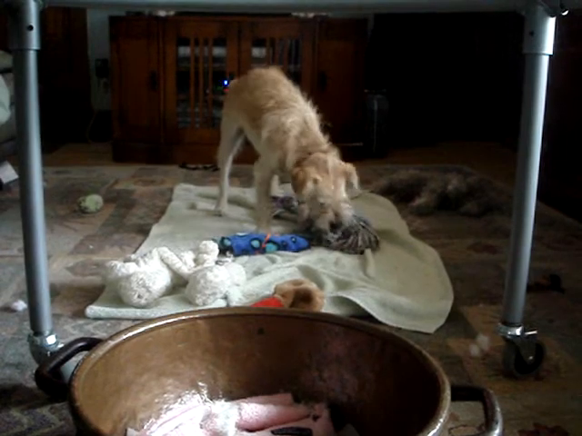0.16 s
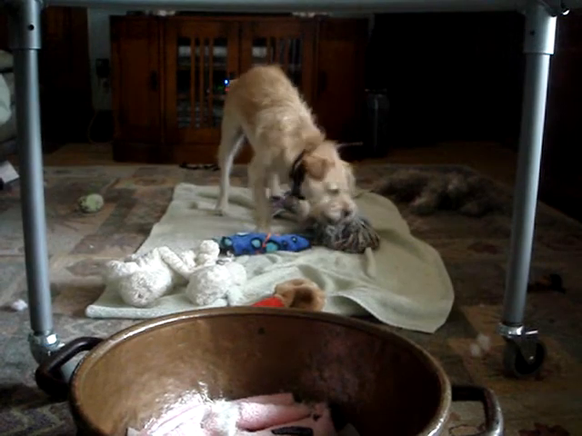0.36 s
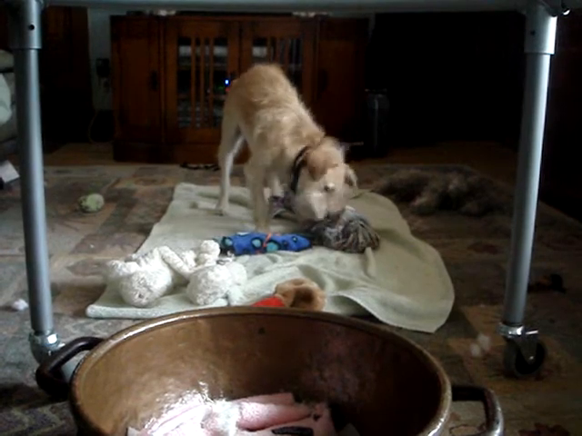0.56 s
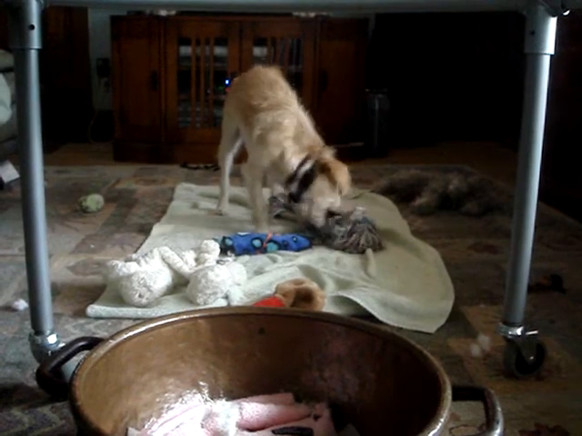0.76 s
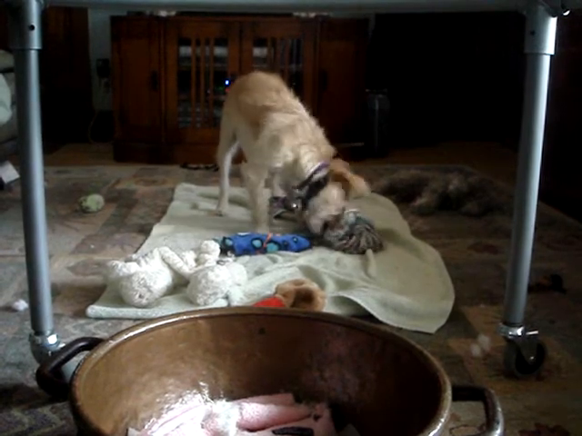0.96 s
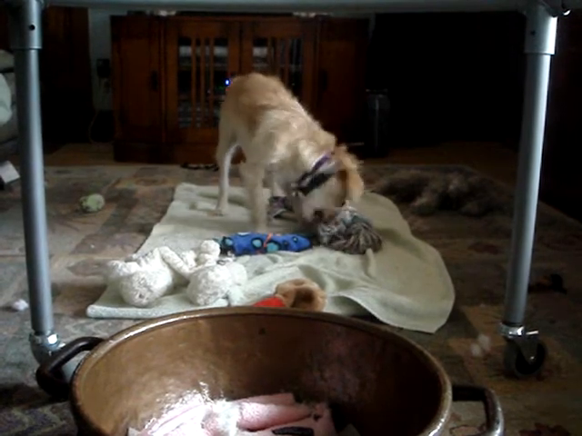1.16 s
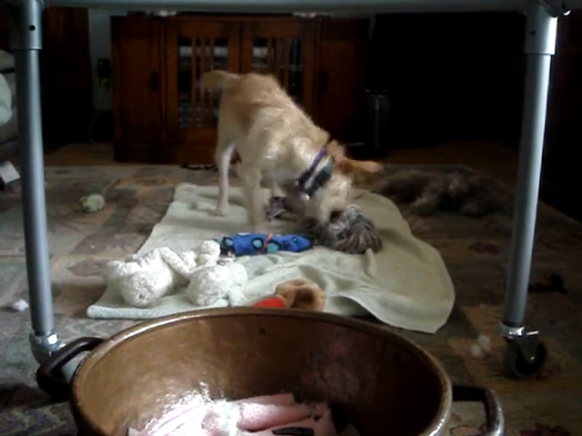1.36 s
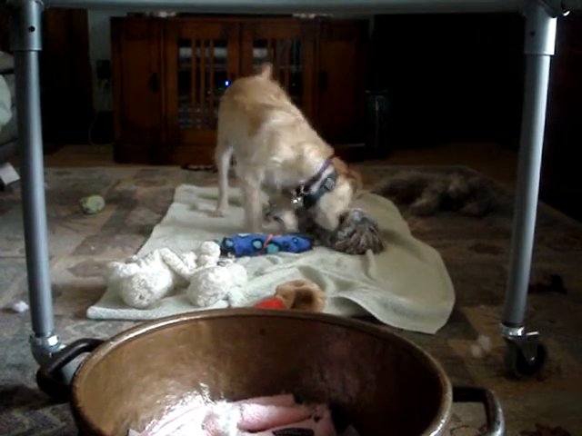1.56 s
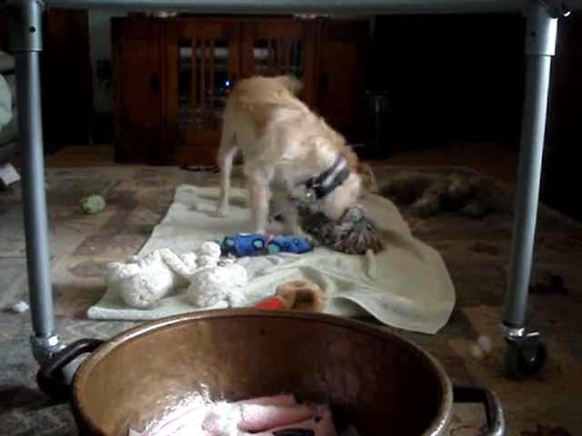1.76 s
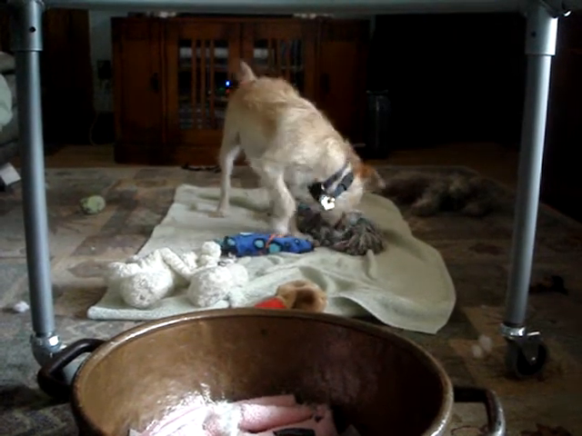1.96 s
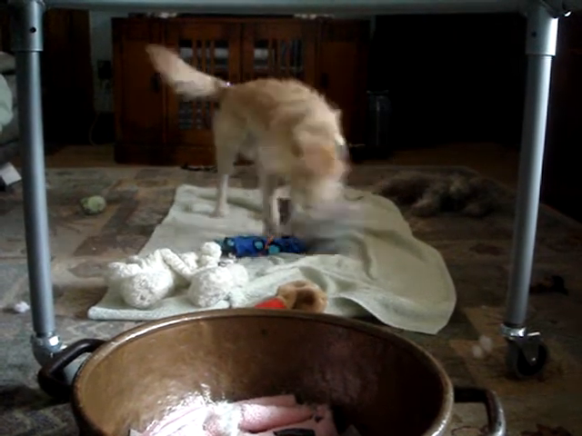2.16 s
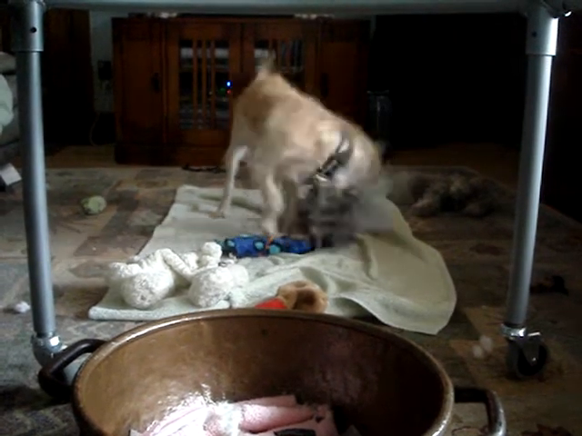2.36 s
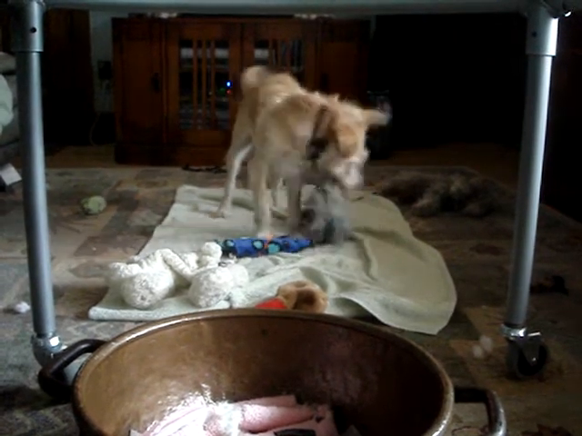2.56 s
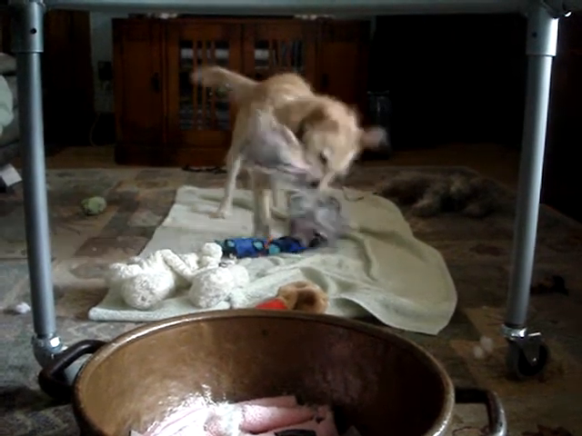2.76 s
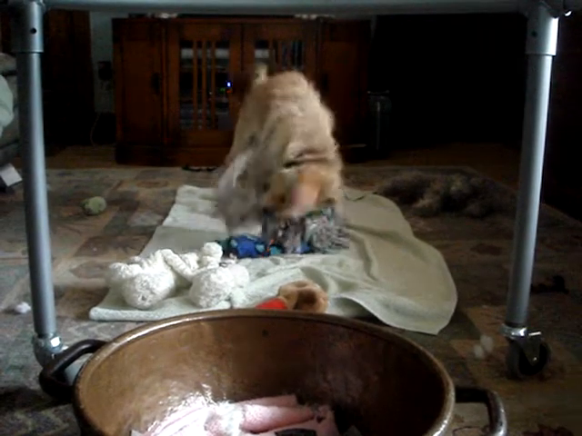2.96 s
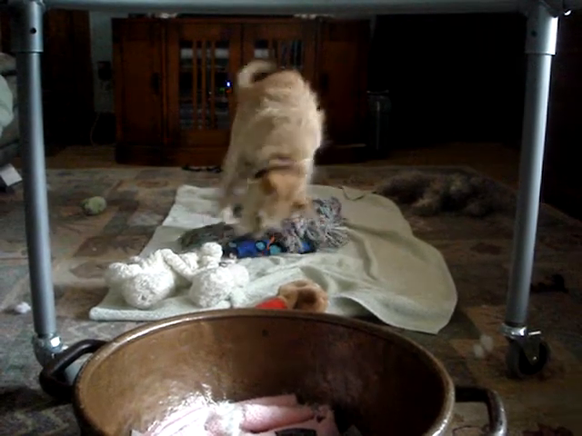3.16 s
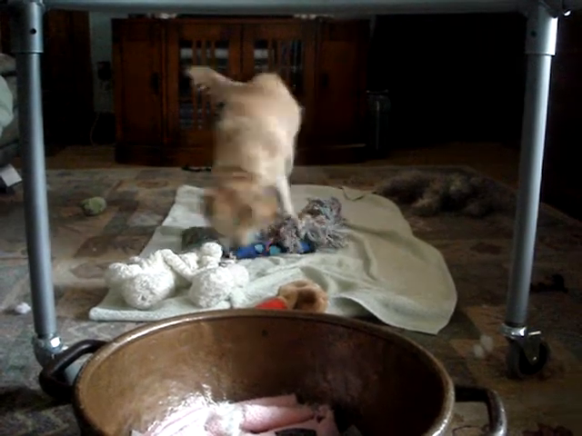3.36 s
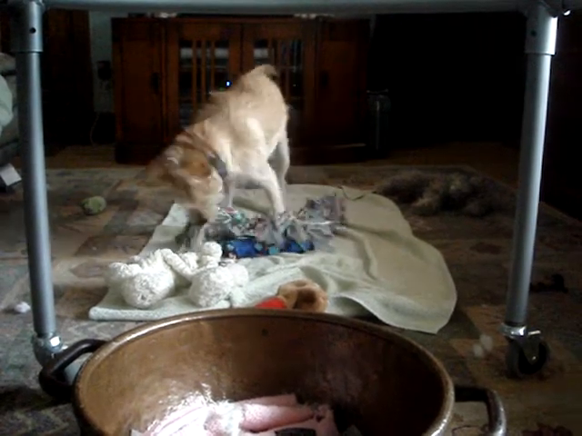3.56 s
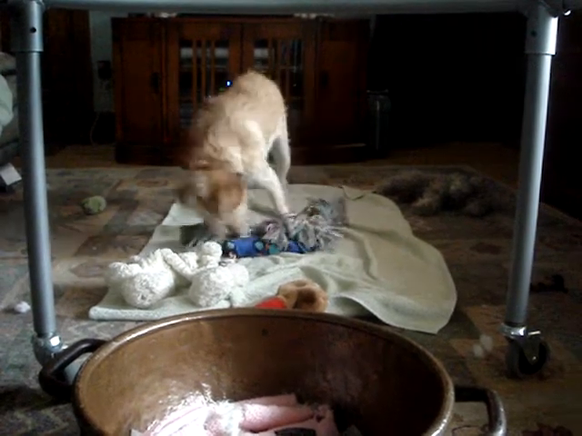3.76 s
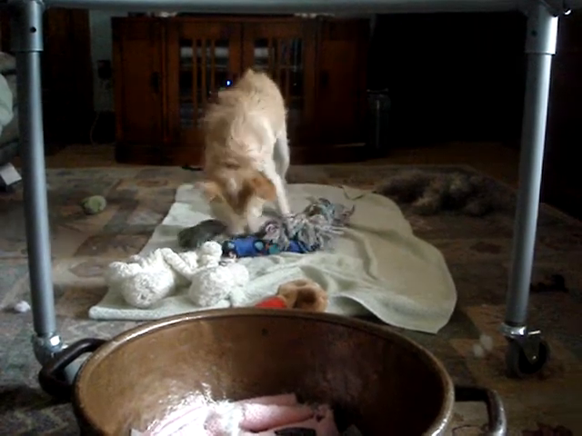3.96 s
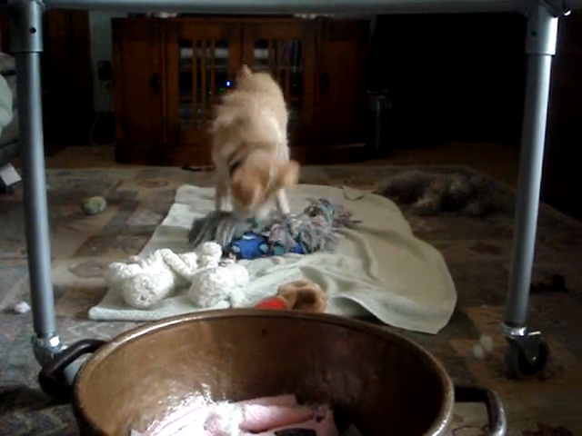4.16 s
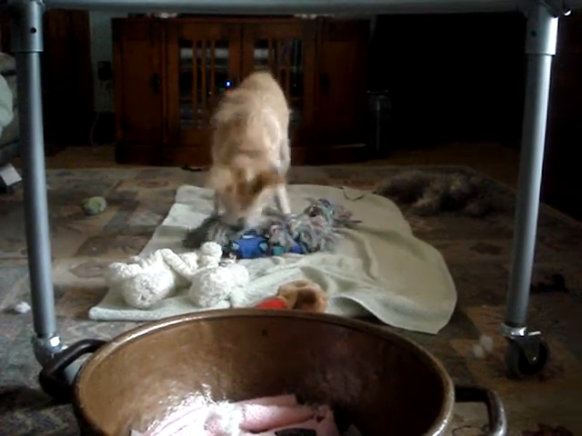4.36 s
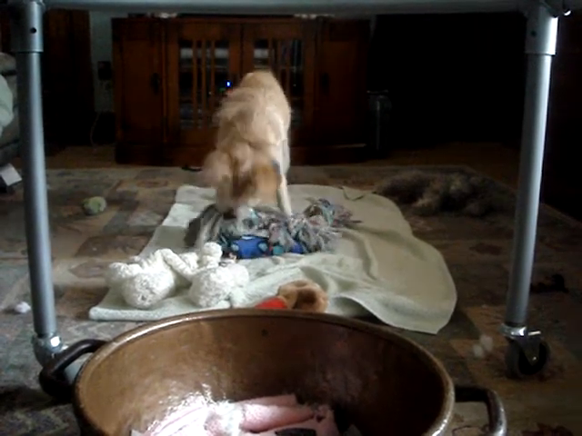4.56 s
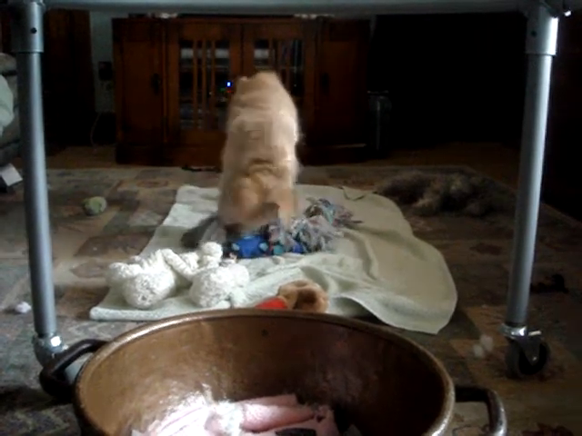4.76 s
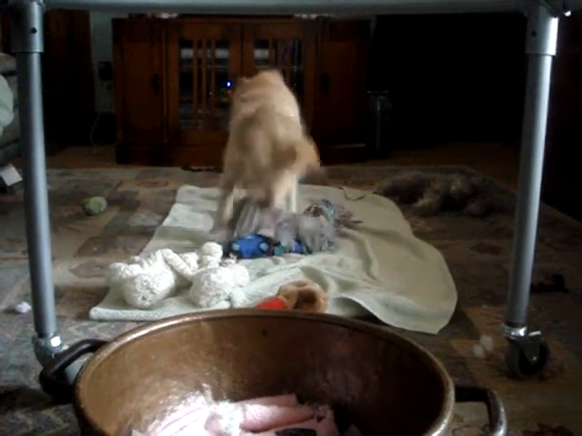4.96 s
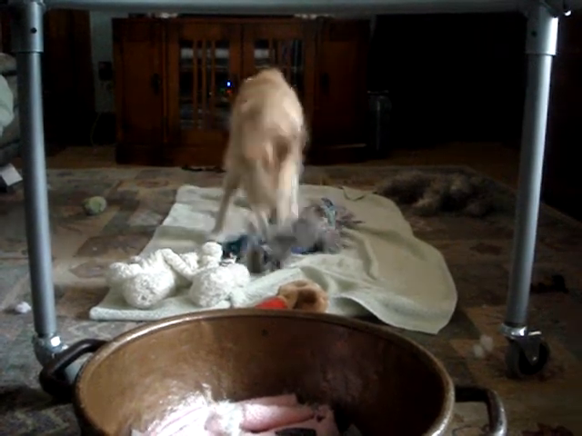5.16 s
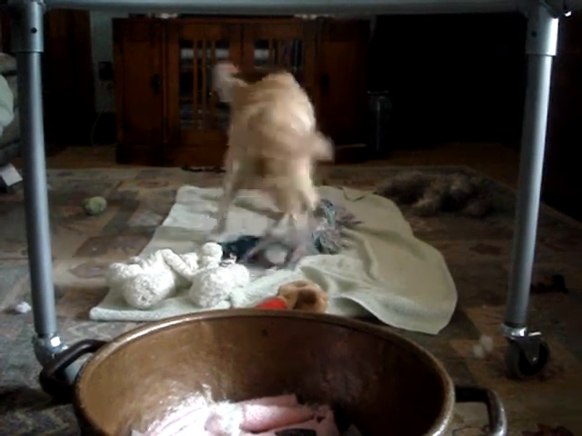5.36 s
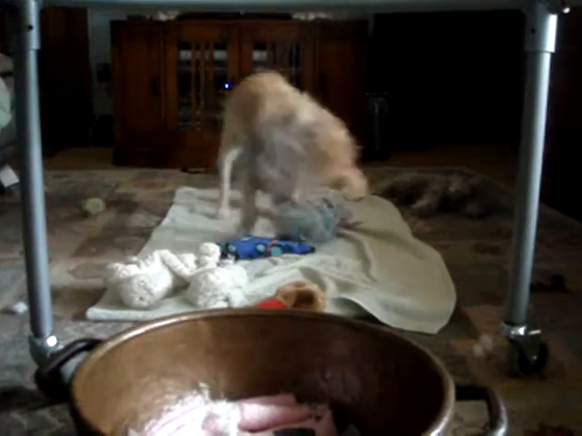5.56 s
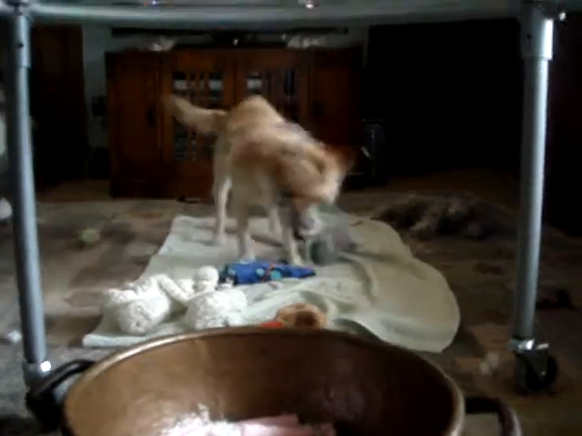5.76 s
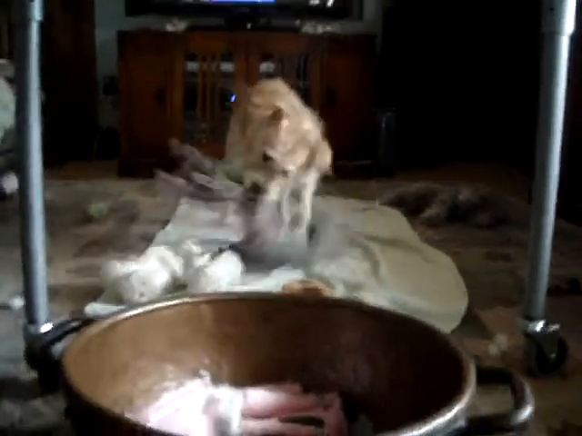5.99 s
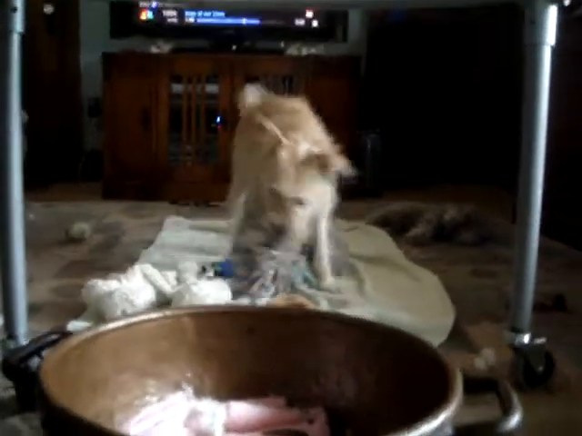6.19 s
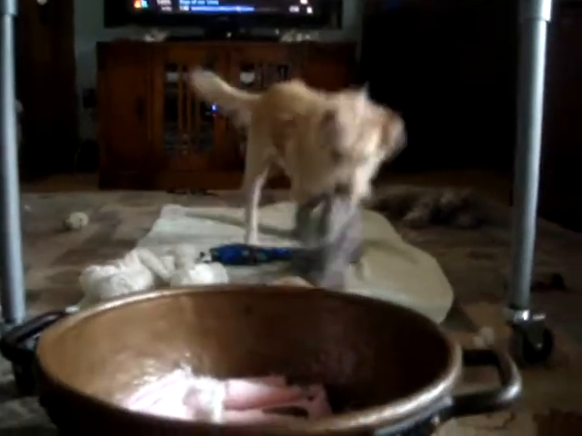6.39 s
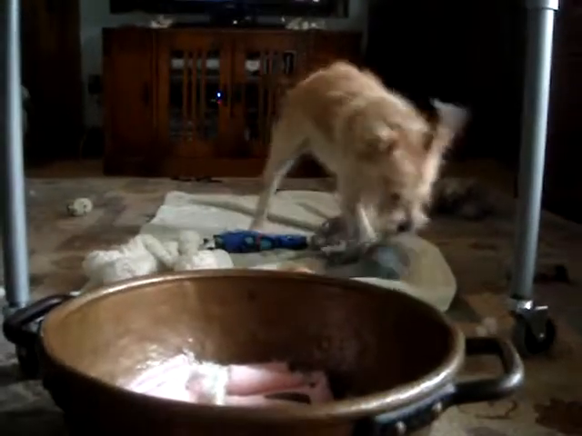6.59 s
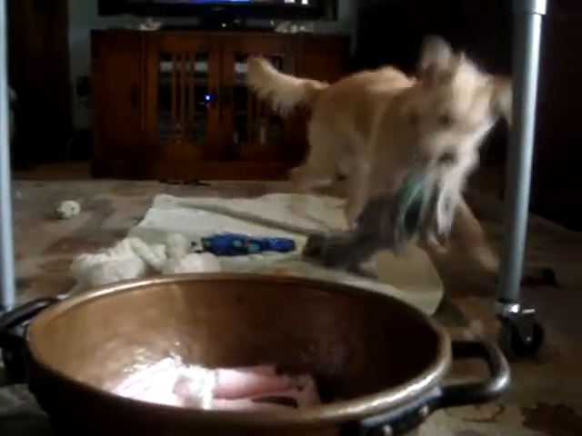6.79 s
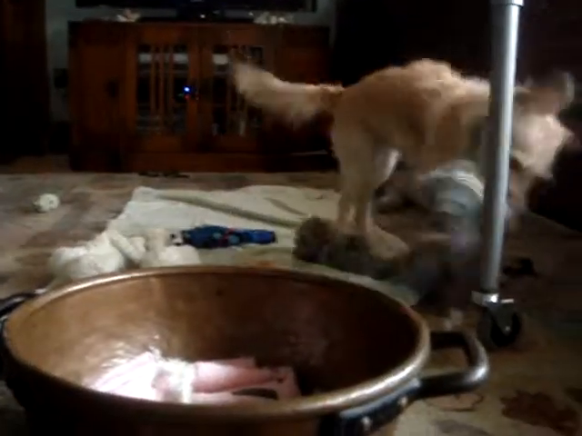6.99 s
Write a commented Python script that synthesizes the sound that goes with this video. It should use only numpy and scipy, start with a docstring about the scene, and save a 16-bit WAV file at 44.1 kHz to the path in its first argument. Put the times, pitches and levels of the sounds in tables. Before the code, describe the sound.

Steady small-microphone hiss and a barely audible high whistle fill a dry, furnished room. From 0 to 2 seconds, a dog's collar tags give light, irregular clinks, with a bright cluster around 0.55 to 0.8 and sharper ticks near 1.8, over faint cloth stirring. At about 2.3 to 2.65 the dog shakes a soft toy: dense jingling, a rustle, soft flaps and a puff of pressure. A dull floor thud with a quick bounce lands near 3.1, a fainter one at 3.2. Sparse clinks follow, then a short rattle around 4.0 to 4.15 and small scuffs until 4.7. After a few ticks near 5.1, the strongest shaking runs from 5.4 to 6.0, with loud bright jangling, swishing fabric, slaps and low rumble. Another rustle and flap come at 6.25, a jingling shake with a soft thump at 6.6, then a faint thud and last clink near 7.0.

```python
"""Bright metal clinks come in bursts, over cloth rustle, soft flaps and a few thuds on the floor:
a dog worries and shakes a soft toy on a blanket in a furnished room.
Touches of the collar tags ring damped metal modes; cloth is clumpy noise; thuds ring floor boards.
A small microphone adds hiss and feels the shakes as puffs of pressure; a thin whistle hangs in the room."""
import sys
import numpy as np
from scipy import signal
from scipy.fft import rfft, irfft
from scipy.io import wavfile

SR = 44100
rng = np.random.default_rng(int(sys.argv[2]) if len(sys.argv) > 2 else 0)


def wav_out(sig):
    """Save sig, one row per channel (or a flat mono array), as 16-bit PCM at SR to the path in sys.argv[1]."""
    wavfile.write(sys.argv[1], SR, np.round(np.clip(np.atleast_2d(sig).T, -1, 1) * 32767).astype(np.int16))


def level_to_linear(level):
    """Convert decibel levels to linear amplitude factors, elementwise."""
    exponent = np.asarray(level, float) / 20
    return 10 ** exponent


N = 310023   # length in samples

# Tags touching. Each row: time in seconds, peak of the dull clack in dB and of the bright ring in dB
# (both before their high-pass), chatter scale in ms.
CLINKS = [(0.0199, -39, -30, 6.1), (0.204, -50, -33.5, 7.5), (0.5515, -32.5, -29, 1.85),
          (0.5582, -30, -32, 3.2), (0.5793, -28.5, -37, 2.3), (0.7255, -37.5, -41, 4.7),
          (0.7588, -33, -34.5, 0.69), (0.8115, -26.5, -17.5, 1.63), (0.819, -33, -36, 3.3),
          (0.9221, -38, -26, 4.4), (1.027, -39, -36, 2.7), (1.118, -42.5, -37.5, 2.6),
          (1.3185, -33.5, -59, 0.66), (1.394, -40, -36.5, 6), (1.429, -33.5, -48, 2.5),
          (1.4423, -30.5, -29, 1.62), (1.457, -32, -34, 1.96), (1.484, -40, -36, 3.2),
          (1.501, -38, -33, 1.85), (1.6217, -34, -28, 1.6), (1.6324, -31, -21.5, 2.24),
          (1.786, -21, -42, 0.46), (1.8037, -28, -31.5, 0.43), (1.935, -32.5, -26.5, 1.33),
          (1.976, -33.5, -29.5, 2.3), (2.0013, -38, -30.5, 1.84), (2.0442, -35.5, -28.5, 3.65),
          (2.251, -32, -30, 11), (2.2677, -26.5, -37, 0.85), (2.357, -35, -23.5, 8),
          (2.372, -38, -31.5, 2.7), (2.397, -35.5, -20.5, 6), (2.4125, -28.5, -24, 2.6),
          (2.42, -50, -34, 4.3), (2.443, -19.5, -18.5, 0.78), (2.4488, -27.5, -22.5, 8.8),
          (2.459, -29, -24, 4.6), (2.536, -22.5, -24, 0.98), (2.554, -38, -33, 1.3), (2.559, -40, -27, 4),
          (2.6496, -29, -23.5, 1.14), (2.875, -34, -32, 3.5), (3.1038, -34, -55, 0.4),
          (3.4402, -34.5, -47, 4.1), (3.784, -34.5, -27.5, 6.1), (3.8128, -34, -30, 10),
          (3.999, -37.5, -32, 17), (4.0346, -32, -23.5, 4.5), (4.058, -30, -28, 4.9),
          (4.064, -31.5, -33, 4.1), (4.141, -28.5, -23.5, 10), (4.924, -32.5, -52, 2.6),
          (5.068, -26, -31, 2.26), (5.0787, -32, -37, 2.1), (5.148, -36.5, -57, 1.6),
          (5.4275, -25, -42, 1.7), (5.434, -27, -29.5, 1.8), (5.4381, -30, -29, 10.4),
          (5.522, -40, -23.5, 11.3), (5.539, -29, -29, 6.3), (5.548, -18, -17.5, 7.3),
          (5.579, -24.5, -25, 6), (5.6094, -19.5, -27, 1.53), (5.6744, -25, -50, 3.7),
          (5.692, -39, -24, 3.8), (5.715, -35, -29, 6.6), (5.732, -35, -18, 3.7), (5.737, -36, -22, 4.6),
          (5.761, -32, -24.5, 5.6), (5.818, -43, -23, 8.2), (5.826, -29.5, -16.5, 8),
          (5.913, -39, -29, 3.1), (5.9201, -32, -21.5, 8.2), (5.957, -33, -27, 6.2),
          (6.109, -31.5, -34.5, 11), (6.183, -28.5, -20.5, 2.5), (6.24, -33, -29.5, 3),
          (6.431, -30.5, -56, 2.5), (6.498, -46, -34, 9.3), (6.61, -31.5, -60, 10),
          (6.6272, -26, -19.5, 5.5), (6.683, -33.5, -29, 4.3), (7.019, -31, -32, 1.9)]
# Flat tag faces and collar hardware, heavily damped.
# Each row: nominal pitch in Hz, relative level in dB, time to fall 60 dB in seconds.
CLACK_MODES = [(1140, -16.5, 0.017), (1884, -13, 0.02), (2095, 1, 0.0061), (2850, 0, 0.0046),
               (3425, -11, 0.014), (3670, 0, 0.0026), (4820, -1, 0.0026)]
# Bending modes of the thin tags.
# Each row: nominal pitch in Hz, relative level in dB, time to fall 60 dB in seconds.
TAG_MODES = [(5200, -8.5, .004), (5630, 1, 0.041), (5950, 5.5, 0.029), (6500, -4, 0.075),
             (6970, 6.5, 0.024), (7885, 15.5, 0.01), (8495, 15.5, 0.011), (8860, 7, 0.01),
             (9570, 11, 0.015)]
# Single hard knocks of a tag edge. Each row: time in seconds, strike level in dB, pitch in Hz.
KNOCKS = [(0.5426, -39, 4300), (.5875, -34, 3350), (.978, -31, 7700), (1.304, -38.5, 3500),
          (1.7866, -18.5, 4950), (1.8042, -18.5, 5340), (2.124, -38, 2000), (5.0679, -28, 3370),
          (5.382, -37, 4500), (5.404, -37, 2000), (5.5533, -15, 6900), (5.886, -29.5, 2150),
          (5.958, -38, 3520), (6.466, -32.5, 6200), (6.5423, -28, 3300)]
KNOCK_CYCLES = 19.7   # cycles to fall 60 dB
# A tag swings free and one mode sings on. Each row: time in seconds, peak in dB, pitch in Hz.
CHIMES = [(2.361, -43, 6600), (5.914, -38.5, 5730)]
CHIME_T60_S = 0.21
# The tags tremble on after a touch: power against the touch peak, per ms of chatter scale.
SETTLE_DB, SETTLE_T60_S = -24.5, 0.27
RING_SETTLE_DB = -6.5   # further drop for the bright trembling
# Jerks of the collar that set the tags rattling. Each row: time in seconds, rms level in dB.
JERKS = [(.23, -54.5), (.84, -71), (1.535, -57), (1.655, -53.5), (2.49, -50), (5.88, -58.5), (6.665, -52),
         (4.04, -46), (5.96, -51)]
JERK_RISE_DB_PER_S, JERK_FALL_DB_PER_S = 252, 154
# Collar hardware brushing through the fur. Each row: start in seconds, rms level in dB.
SCUFFS = [(4.41, -54.5), (4.662, -52.5), (4.1, -57), (6.23, -59), (0.61, -56)]
SCUFF_HOLD_S, SCUFF_RISE_DB_PER_S, SCUFF_FALL_DB_PER_S = 0.029, 799, 301
# Collar ring dragging under the swinging toy.
# Each row: start of the hold in seconds, hold in seconds, rms level in dB.
DRAGS = [(5.95, 0.11, -51), (6.595, 0.07, -52.5)]
DRAG_RISE_DB_PER_S, DRAG_FALL_DB_PER_S = 275, 194
SHIMMER_HZ, SHIMMER_T60_S, SHIMMER_LUMP_DB = 2060, 0.028, 1.5
# Bouts of tugging and shaking the toy.
# Each row: start of the hold in seconds, hold in seconds, rms level of the cloth rustle in dB.
TUGS = [(0.207, 0.051, -57.5), (0.57, 0.061, -60), (1.475, 0.078, -56.5), (2.284, 0.057, -51.5),
        (2.442, 0.026, -61), (5.442, 0.1, -53.5), (5.605, 0.16, -47), (5.796, 0.32, -48),
        (6.233, 0.15, -52.5), (6.586, 0.18, -48)]
CLOTH_RISE_DB_PER_S, CLOTH_FALL_DB_PER_S = 139, 120   # for rustle and rumble
# Colour of the cloth rustle. Each row: frequency in Hz, relative density in dB per Hz.
RUSTLE = [(120, -5), (300, -1.5), (900, 2.5), (1700, -3.5), (2070, -2.5), (2500, -4), (4200, -4.5),
          (9000, -19)]
RUSTLE_GRAIN_DB = 2.2   # how lumpy the rustle is
# Steady faint stirring of cloth between the bouts, and a steady faint grain high in the treble; rms levels.
STIR_RUSTLE_DB, FLOOR_GRAIN_DB = -64.5, -67
# Ears and toy slapping. Each row: time in seconds, strike level in dB, main pitch in Hz.
FLAPS = [(1.521, -39, 900), (2.322, -37.5, 795), (2.431, -32.5, 793), (5.549, -37.5, 436),
         (5.676, -26, 516), (5.699, -24, 656), (5.91, -33, 606), (5.926, -23.5, 590), (5.949, -33.5, 543),
         (6.267, -31, 700)]
# Paws and toy landing on the floor. Each row: time in seconds, nominal level in dB, contact in ms.
THUDS = [(3.071, -28, 1.9), (3.22, -38, 8.1), (6.559, -38.5, 4.4), (6.925, -48, 4.5)]
BOUNCE_S, BOUNCE_LOSS_DB = 0.042, 6.5   # a soft body lands and bounces once
# Modes of the floor boards.
# Each row: pitch in Hz, relative level in dB, time to fall 60 dB in seconds.
FLOOR_MODES = [(98.3, -14, 0.44), (126.6, -3.5, 0.56), (149, 6.5, 0.19), (222, 5, 0.17), (278, -7, 0.26),
               (339.2, -1.5, 0.2), (443, -4, 0.095), (557, -5, 0.06), (700, -2, 0.05)]
# The blanket is dragged over the boards.
# Each row: start of the hold in seconds, hold in seconds, rms level in dB.
RUMBLES = [(2.306, 0.15, -55.5), (3.107, 0.045, -52.5), (5.692, 0.021, -45), (6.2, 0.17, -56.5),
           (6.59, 0.073, -66)]
RUMBLE_LOW_HZ, RUMBLE_HIGH_HZ = 60, 434
# Pushes of air on the microphone.
# Each row: time in seconds, peak before the band-pass in dB, decay constant in seconds.
PUFFS = [(2.417, -38.5, 0.023), (5.556, -37.5, 0.017), (5.762, -40, 0.007), (6.598, -44, .008),]
ROOM_T60_S, ROOM_DB = 0.079, -19   # decay of the lower echoes; echo level
WHINE_HZ, WHINE_DB = 7876, -78   # a thin whistle in the room; typical peak
# Colour of the microphone hiss. Each row: frequency in Hz, relative density in dB per Hz.
HISS = [(20, -37), (50, -9), (160, 5.5), (450, 9), (1300, 4.5), (3000, -1), (5600, -2.5), (7200, -5),
        (8000, -2), (8800, -22), (9900, -12)]
HISS_DB = -55.5   # rms
CUTOFF_HZ = 10170


def rms_one(x):
    """Scale to rms 1."""
    return x / np.sqrt(np.mean(x ** 2) + 1e-20)


def filtered(x, hz, kind):
    """Second-order Butterworth design, high-pass or band-pass."""
    return signal.sosfilt(signal.butter(2, hz, kind, fs=SR, output="sos"), x)


def clicks(times, sizes):
    """An impulse train."""
    out = np.zeros(N)
    at = np.clip((np.asarray(times) * SR).astype(int), 0, N - 1)
    np.add.at(out, at, sizes)
    return out


def ring(x, hz, t60):
    """Damped resonator: a unit click sets a sine of height 1 ringing."""
    r, w = level_to_linear(-60 / (t60 * SR)), 2 * np.pi * hz / SR
    return signal.lfilter([0, np.sin(w)], [1, -2 * r * np.cos(w), r * r], x + 1e-18)


def coloured(spectrum):
    """Noise with a spectrum given in dB per Hz; rms 1."""
    hz, db = np.transpose(spectrum)
    grid = np.linspace(1, SR / 2, N // 2 + 1)
    gain = level_to_linear(np.interp(np.log(grid), np.log(hz), db))
    return rms_one(irfft(rfft(rng.standard_normal(N)) * gain, N))


def drift(rate):
    """Slow random wander of rms 1: noise through two equal low-pass poles at rate in Hz."""
    r = np.exp(-2 * np.pi * rate / SR)
    return rms_one(signal.lfilter([1], [1, -2 * r, r * r], rng.standard_normal(N + SR))[SR:])


def bouts(s, hold, peak_db, rise, fall):
    """Power against time of bouts that swell, hold and die away at steady rates in dB per s."""
    coarse = np.arange(N)[::64]
    late = coarse[:, None] / SR - s
    db = peak_db - rise * np.maximum(-late, 0) - fall * np.maximum(late - hold, 0)
    return np.interp(np.arange(N), coarse, (level_to_linear(db) ** 2).sum(axis=1))


def clinks():
    """Each tag touch gives a dull clack and a short bright ring; so small a thing radiates no bass."""
    clack_db, ring_db = np.transpose(CLINKS)[1:3]
    clacks = jangle(clack_db, CLACK_MODES, spread_db=4.0, detune=0.037, skew=0.43)
    rings = jangle(ring_db, TAG_MODES, spread_db=1.0, detune=0.024, skew=0.67)
    return filtered(clacks, 1100, "high") + filtered(rings, 4500, "high")


def jangle(peak_db, modes, spread_db, detune, skew):
    """Tiny contacts swell fast and fade, each striking modes that fur and swing shift a little."""
    s, chatter = np.transpose(CLINKS)[0], np.transpose(CLINKS)[3] / 1000
    hz, mode_db, t60 = np.transpose(modes)[:, None, :, None]
    t = np.arange(1024) / SR
    chance = rng.standard_normal((len(s), len(modes), 2))
    decay = level_to_linear(mode_db + spread_db * chance[..., :1] - 60 * t / t60)
    rings = decay * np.sin(2 * np.pi * hz * (1 + detune * chance[..., 1:]) * t)

    # 40 contacts a touch, spread over 1.5 times the chatter scale
    phase = rng.random((len(s), 1, 40))
    at = np.clip(phase * 1.5 * chatter[:, None, None] * SR, 0, 1023).astype(int)
    swell = np.sin(np.pi * phase ** skew) ** 0.49
    own = rng.standard_normal((len(s), len(modes), 40))
    shared = 0.98 * rng.laplace(size=phase.shape)   # the same push on all modes
    contacts = np.zeros((len(s), len(modes), 1024))
    touch, mode = np.arange(len(s))[:, None, None], np.arange(len(modes))[:, None]
    np.add.at(contacts, (touch, mode, at), swell * (own + shared))

    touches = signal.fftconvolve(contacts, rings, axes=2).sum(axis=1)
    touches *= (level_to_linear(peak_db) / np.abs(touches).max(axis=1))[:, None]
    out = np.zeros(N + touches.shape[1])
    start = ((s - 0.0005) * SR).astype(int)   # half a millisecond ahead of the table time
    np.add.at(out, start[:, None] + np.arange(touches.shape[1]), touches)
    return out[:N]


def knocks():
    """A tag edge rings one short mode, then again 0.4 ms later, weaker and in opposite sign."""
    out = np.zeros(N)
    for s, db, hz in KNOCKS:
        t60 = KNOCK_CYCLES / hz
        out += ring(clicks([s], level_to_linear(db)), hz, t60)
        out -= 0.37 * ring(clicks([s + 0.0004], level_to_linear(db)), hz, t60)
    return out


def chimes():
    """Clear of the fur, a struck tag holds a single thin note."""
    return sum(ring(clicks([s], level_to_linear(db)), hz, CHIME_T60_S) for s, db, hz in CHIMES)


def rattle(power, modes, per_s, uneven_db):
    """Tags slide and tick on each other: dense random ticks, each ringing one mode."""
    sizes = level_to_linear(uneven_db * np.minimum(rng.exponential(1, N), 3))
    ticks = sizes * (rng.random(N) < per_s / SR)
    dealt = rng.integers(0, len(modes), N)
    rings = sum(ring(ticks * (dealt == k) * level_to_linear(level), hz, t60)
                for k, (hz, level, t60) in enumerate(modes))
    return np.sqrt(power) * rms_one(rings)


def settling(peak_db):
    """Power of the trembling after a touch, greater the longer the tags chattered."""
    s, chatter_ms = np.transpose(CLINKS)[[0, 3]]
    kicks = clicks(s + chatter_ms / 1000, level_to_linear(peak_db + SETTLE_DB) ** 2 * chatter_ms)
    return signal.lfilter([1], [1, -level_to_linear(-120 / (SETTLE_T60_S * SR))], kicks + 1e-18)


def tag_rattle():
    """Jerks and trembling tick the bright tag modes over a steady faint grain; trembling alone ticks the dull
    ones."""
    clack_db, ring_db = np.transpose(CLINKS)[1:3]
    jerk_s, jerk_db = np.transpose(JERKS)
    jerking = bouts(jerk_s, 0, jerk_db, JERK_RISE_DB_PER_S, JERK_FALL_DB_PER_S)
    bright_power = level_to_linear(FLOOR_GRAIN_DB) ** 2 + jerking + settling(ring_db + RING_SETTLE_DB)
    bright = rattle(bright_power, TAG_MODES, per_s=1500, uneven_db=5.5)
    dull = rattle(settling(clack_db), CLACK_MODES, per_s=3500, uneven_db=5.0)
    return bright + dull


def scuffs():
    """Hardware brushing through fur ticks three of the dull modes in brief bouts."""
    s, db = np.transpose(SCUFFS)
    power = bouts(s, SCUFF_HOLD_S, db, SCUFF_RISE_DB_PER_S, SCUFF_FALL_DB_PER_S)
    return rattle(power, CLACK_MODES[1:4], per_s=2500, uneven_db=7.0)


def shimmer():
    """Lumpy friction noise keeps one low mode of the hardware singing."""
    power = bouts(*np.transpose(DRAGS), DRAG_RISE_DB_PER_S, DRAG_FALL_DB_PER_S)
    friction = rng.standard_normal(N) * level_to_linear(SHIMMER_LUMP_DB * drift(30))
    return np.sqrt(power) * rms_one(ring(friction, SHIMMER_HZ, SHIMMER_T60_S))


def rustle():
    """Cloth drags over cloth: coloured noise in short clumps, swelling with each tug."""
    tugging = bouts(*np.transpose(TUGS), CLOTH_RISE_DB_PER_S, CLOTH_FALL_DB_PER_S)
    clumps = coloured(RUSTLE) * level_to_linear(RUSTLE_GRAIN_DB * drift(61))
    return np.sqrt(level_to_linear(STIR_RUSTLE_DB) ** 2 + tugging) * rms_one(clumps)


def flaps():
    """A soft slap: two opposed dull rings of a few cycles and a longer, weaker flutter."""
    out = np.zeros(N)
    for s, db, hz in FLAPS:
        hit = clicks([s + 0.0017], level_to_linear(db))
        t60 = 13.5 / hz
        out += ring(hit, hz, t60) - 0.54 * ring(hit, 1.715 * hz, t60)
        out -= level_to_linear(-17.5) * ring(hit, 0.696 * hz, 0.17)
    push = np.hanning(round(0.00063 * SR))   # the softness of the contact
    return np.convolve(out, push / push.sum())[:N]


def strike(s, db, modes):
    """Each blow rings every mode, neighbours in opposite phase."""
    return sum((-1) ** (k + 1) * level_to_linear(mode_db) * ring(clicks(s, level_to_linear(db)), hz, t60)
               for k, (hz, mode_db, t60) in enumerate(modes))


def thuds():
    """Soft contacts of a few milliseconds ring the floor boards; the room roughens the boom."""
    boards = np.zeros(N)
    for s, db, contact_ms in THUDS:
        push = np.hanning(round(contact_ms * SR / 1000))
        blow_db = np.array([db, db - BOUNCE_LOSS_DB]) - 4.0
        blows = strike([s, s + BOUNCE_S], blow_db, FLOOR_MODES)
        boards += signal.fftconvolve(blows, push / push.sum())[:N]
    return boards + level_to_linear(-18) * room(boards)


def rumble():
    """Lumpy low noise while cloth slides on the floor."""
    noise = filtered(rng.standard_normal(N), [RUMBLE_LOW_HZ, RUMBLE_HIGH_HZ], "band")
    power = bouts(*np.transpose(RUMBLES), CLOTH_RISE_DB_PER_S, CLOTH_FALL_DB_PER_S)
    return np.sqrt(power) * rms_one(noise * level_to_linear(2.9 * drift(23)))


def puffs():
    """A sudden step of pressure on the microphone that leaks away."""
    t = np.arange(N) / SR
    steps = sum(level_to_linear(db) * np.exp(-np.maximum(t - s, 0) / decay) * (t >= s) for s, db, decay in PUFFS)
    return filtered(steps, [12, 900], "band")


def room(x):
    """Diffuse echoes: decaying noise after a 4 ms gap, the treble dying first."""
    t = np.arange(SR // 2) / SR
    tail = rng.standard_normal(len(t)) * (t > 0.004)
    low = signal.lfilter([0.35], [1, -0.65], tail)
    treble = (tail - low) * level_to_linear(-60 * t / (0.067 * ROOM_T60_S))
    echoes = low * level_to_linear(-60 * t / ROOM_T60_S) + treble
    return signal.fftconvolve(x, echoes / np.sqrt(np.sum(echoes ** 2)))[:N]


def whine():
    """A thin whistle: one sine of steady pitch whose level wavers a little."""
    level = level_to_linear(WHINE_DB + 1.3 * drift(6.4))
    return level * np.sin(2 * np.pi * WHINE_HZ * np.arange(N) / SR)


def hiss():
    """Steady coloured noise of the small microphone."""
    return level_to_linear(HISS_DB) * coloured(HISS)


def scene():
    """Dog, toy and tags in the room, over the hiss."""
    tags = clinks() + knocks() + chimes() + tag_rattle() + scuffs() + shimmer()
    dog = tags + rustle() + flaps()
    floor = thuds() + rumble()
    mix = dog + level_to_linear(ROOM_DB) * room(dog) + floor + puffs() + whine() + hiss()
    return mix[None]


def top_cut(x):
    """Nothing passes above the cut-off."""
    return signal.sosfilt(signal.butter(12, 11320, fs=SR, output="sos"), x)


def record(dry):
    """The top of the spectrum is cut off by a steep elliptic low-pass."""
    steep = signal.ellip(10, 0.5, 50, CUTOFF_HZ, fs=SR, output="sos")
    mix = signal.sosfilt(steep, dry)
    return top_cut(mix)


dry = scene()
out = record(dry)
wav_out(out)
```